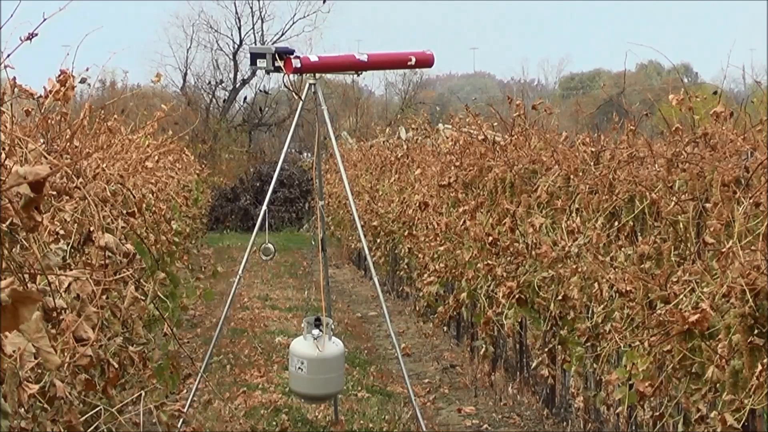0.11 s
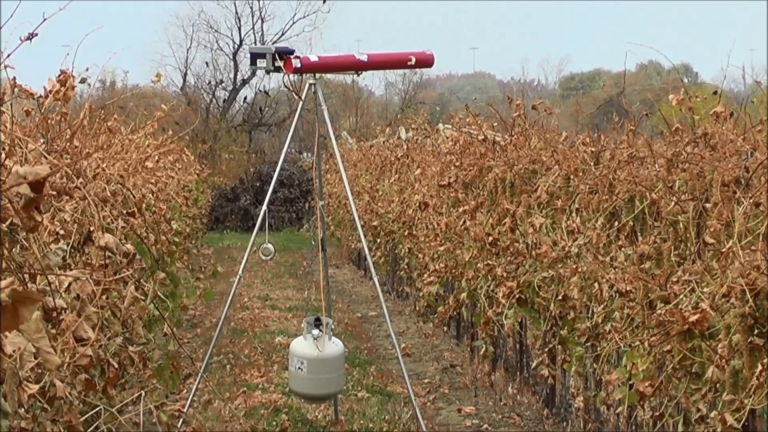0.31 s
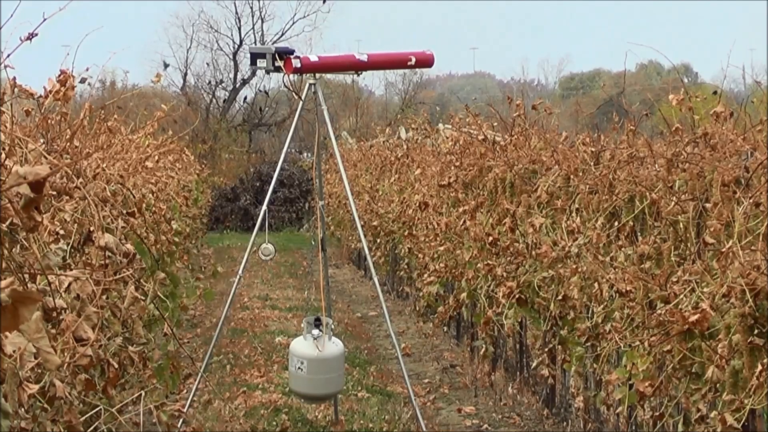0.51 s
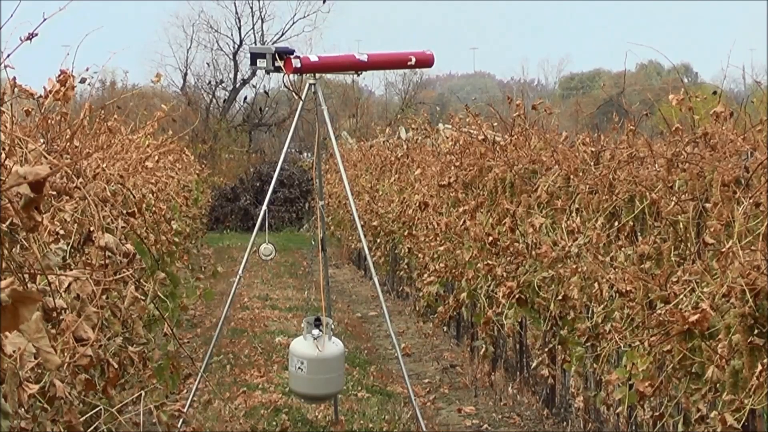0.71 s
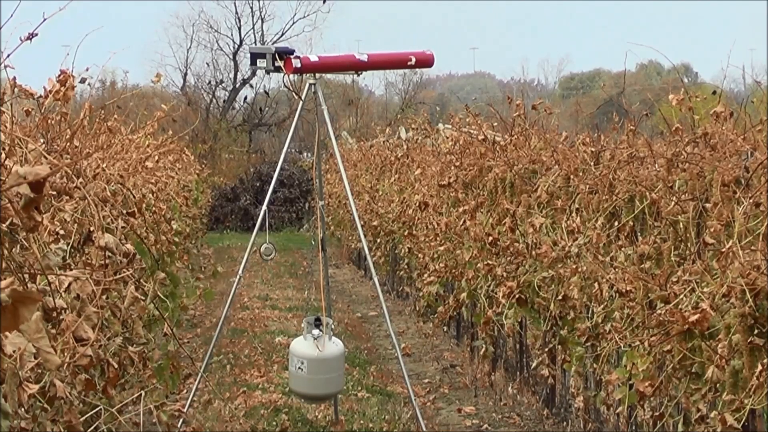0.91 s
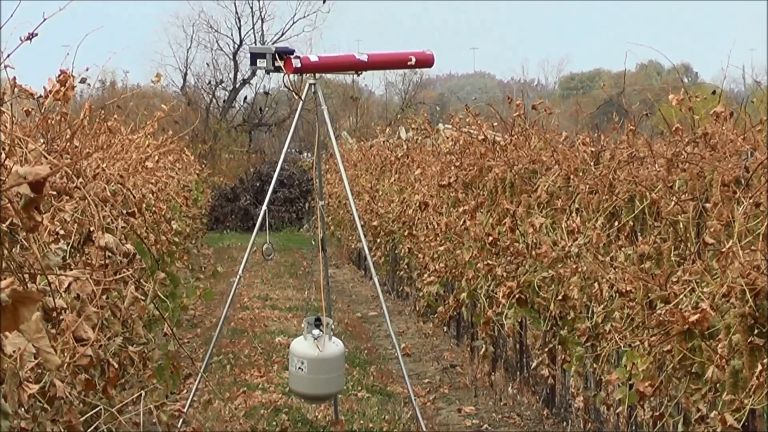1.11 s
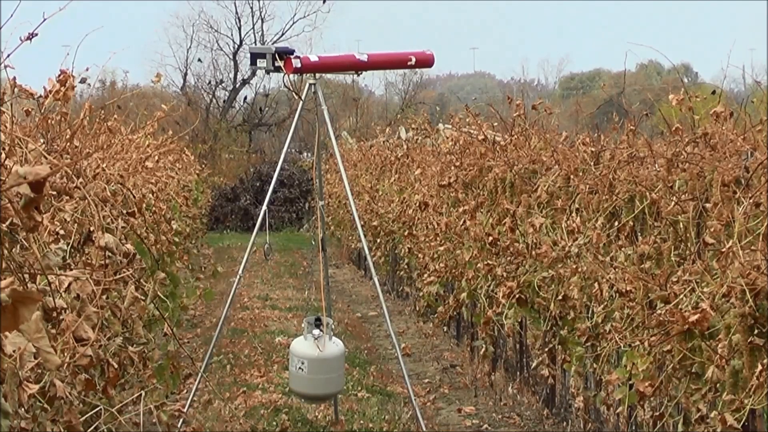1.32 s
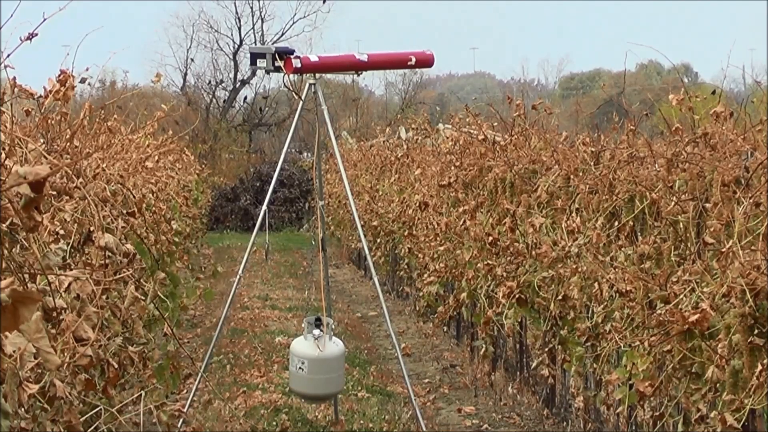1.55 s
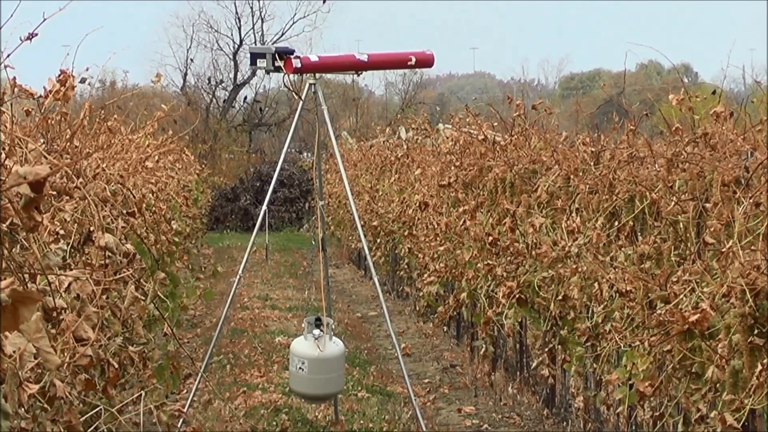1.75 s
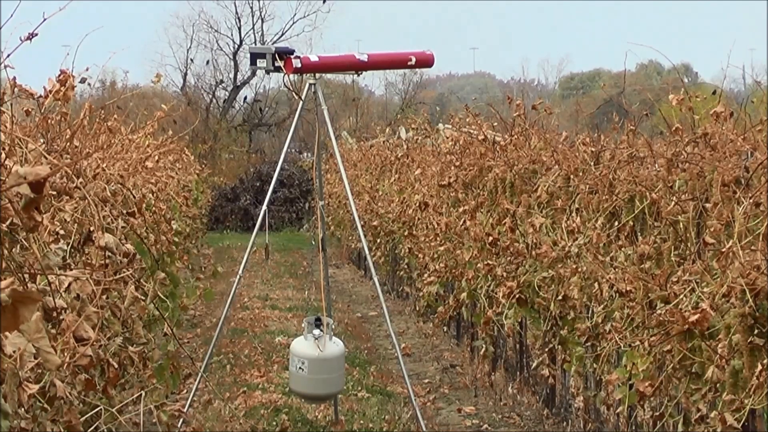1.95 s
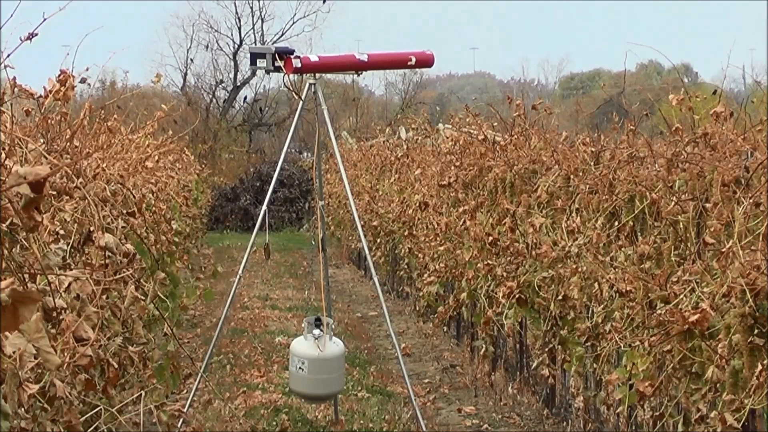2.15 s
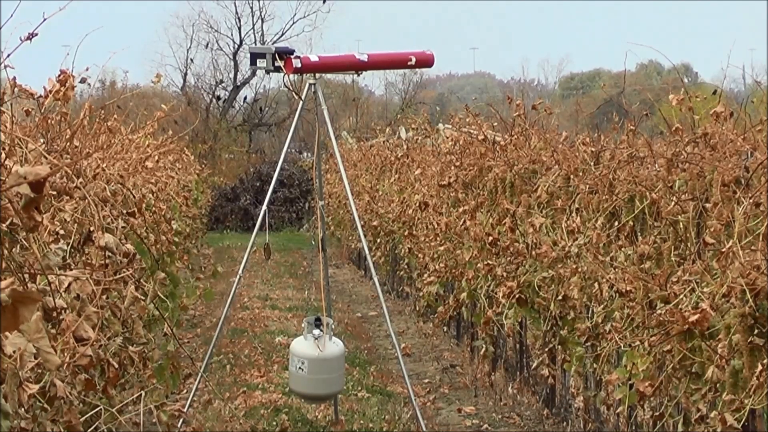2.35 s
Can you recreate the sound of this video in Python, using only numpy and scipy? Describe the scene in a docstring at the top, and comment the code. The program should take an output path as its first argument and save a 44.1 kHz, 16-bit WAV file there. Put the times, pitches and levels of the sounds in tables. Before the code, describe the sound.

In an open vineyard, a distant, slightly muffled gas cannon fires once; quick echoes crackle and die away, a late echo returns, then small birds twitter over steady traffic noise, thin insect shrill and recorder hiss.

```python
"""A propane bird-scare cannon fires once, far to the right across a vineyard, muffled by the ground.
Posts, vine rows and trees return ringing echoes and a dense scatter; larger surfaces return low booms.
Small birds whistle as gliding sines and insects shrill as narrow noise bands.
Behind them lies shaped noise for distant traffic and a far flock, and white hiss from the camera.
A very high whine is a set of sines, one tone wavering in level."""
import sys
import numpy as np
from scipy import signal
from scipy.fft import rfft, irfft
from scipy.io import wavfile
from scipy.ndimage import uniform_filter1d

SR = 44100
rng = np.random.default_rng(int(sys.argv[2]) if len(sys.argv) > 2 else 0)


def waveform_to_disk(signal):
    """Save audio, clipped to [-1, 1], as 16-bit WAV at the path in sys.argv[1]."""
    frames = np.transpose(np.atleast_2d(signal))
    scaled = np.clip(frames, -1, 1) * 32767
    samples = np.round(scaled).astype(np.int16)
    wavfile.write(sys.argv[1], SR, samples)


N = 110250  # 2.5 s
TIME = np.arange(N) / SR  # s
OPPOSITE = np.array([[1], [-1]])  # a sign for each row of a pair


def from_db(db):
    """Level law: gain is 10 to the power of level/20."""
    return 10 ** (np.asarray(db) / 20)


def rms_one(x):
    """Normalisation: scale to unit root-mean-square over all samples and channels."""
    return x / np.sqrt(np.mean(x ** 2) + 1e-20)


def at_hz(points, hz):
    """Logarithmic frequency scale: interpolate a spectrum table along log f."""
    points = np.array(points)
    return np.interp(np.log(hz), np.log(points[:, 0]), points[:, 1])


def drift(rate):
    """Double-pole low-pass filtering: noise becomes a slow wander of spread 1; rate in Hz."""
    step = 40  # samples between computed points
    pole = np.exp(-2 * step * np.pi * rate / SR)
    noise = rng.standard_normal(N // step + 2002)
    slow = signal.lfilter([1], [1, -2 * pole, pole * pole], noise)[2000:]  # settled part
    return np.interp(np.arange(N) / step, np.arange(len(slow)), rms_one(slow))


def shaped(x, gain):
    """Linear filtering: multiply the spectrum of x by gain(Hz)."""
    hz = np.maximum(np.arange(N // 2 + 1) * SR / N, 1)
    return irfft(rfft(x) * gain(hz), N)


def panned(x, pan_db):
    """Level-difference panning: a close pair of microphones hears no direction in the bass."""
    centred_below_hz = 360
    low = signal.sosfilt(signal.butter(1, centred_below_hz, fs=SR, output="sos"), x)
    sides_db = np.array([pan_db, -pan_db]).reshape(2, -1) / 2
    return low + (x - low) * from_db(sides_db)


def add(out, sound, s):
    """Superposition: mix a short sound in at s seconds."""
    i = int(s * SR)
    out[..., i:i + sound.shape[-1]] += sound[..., :N - i]


def wavelet(hz, cycles):
    """Triple resonance struck by a pulse: the envelope swells to 1 over some cycles, then dies."""
    phase = np.arange(int(7 * cycles / hz * SR)) / SR * hz  # in cycles
    envelope = (phase / cycles) ** 2 * np.exp(2 - 2 * phase / cycles)
    return envelope * np.sin(-2 * np.pi * phase)


# Single sharp echoes of the bang: t/s, ring peak level/dB, ring f/Hz,
# crack level before a lift and a band filter/dB, left-right level/dB, cycles to the peak
SHARP_ECHOES = [(.2143, -17, 700, -31, -6, .5), (.2181, -8.5, 1050, -40, -9, 1.1),
                (.2208, -17, 1600, -48, -6, 1), (.2243, -17, 1800, -44, -9, 1.6),
                (.2383, -11, 1850, -38, -10, 1.8), (.2408, -16, 1200, -46, -11, 1.1),
                (.2535, -15, 1800, -42, -11, 2.2), (.2563, -14, 1250, -42, -10, 1.3),
                (.2638, -20, 1700, -48, -2, 1.3), (.2683, -17, 1900, -40, -10, 1.3),
                (.2720, -14, 1800, -46, -6, 1.3), (.2845, -19, 1300, -50, -9, 1.3),
                (.2985, -18, 1700, -50, -8, 1.5), (.3103, -22, 1600, -38, -6, 1),
                (.3148, -22, 1500, -35, -6, 1), (.3198, -22, 1250, -36, -6, 1),
                (.3402, -17, 2300, -31, -12, 1.8), (.3415, -19, 1500, -37, -10, .7),
                (.3405, -27, 480, -60, -6, 1), (.2195, -23, 560, -60, -6, 1.2),
                (.372, -26, 1560, -47, -7, 1.5), (.386, -26, 550, -50, -3, .8),
                (.442, -26, 900, -48, -8, .8), (.65, -33, 1120, -55, 2, 3.0), (.676, -33, 900, -48, -3, .8),
                (.672, -38, 4700, -52, -3, 6.0), (.693, -35, 1300, -56, -1, 2.5),
                (.733, -35, 1300, -58, -1, 2.5), (.7555, -31, 780, -49, -3, 1.4),
                (.576, -34, 600, -58, -2, 1.2), (.849, -34, 1070, -55, 5, 3.0),
                (.894, -36, 1200, -60, 0, 2.5), (.931, -35, 1250, -61, 0, 2.5),
                (1.0255, -23.5, 1170, -60, 7, 2.5), (1.065, -29.5, 1060, -62, 6, 2.3),
                (1.089, -35, 1030, -62, 0, 2.0)]
# Low booms from larger surfaces: t/s, peak level/dB, f/Hz
LOW_BOOMS = [(0.215, -41, 220), (0.282, -36, 222), (0.312, -23, 180), (0.339, -48, 215),
             (0.387, -31.5, 176), (0.438, -34.5, 225), (0.671, -29.5, 143), (0.915, -40, 143)]
CRACK_DECAY_S, CRACK_LOW_HZ, CRACK_HIGH_HZ = 0.0017, 2450, 8000
CRACK_LIFT_DB = 4
BOOM_CYCLES = 1  # to the peak


def bang():
    """Discrete reflection: each echo is a short ring with a bright crack; booms are low rings."""
    out = np.zeros((2, N))
    length = 400  # samples in a crack
    decay = np.exp(-np.arange(length) / SR / CRACK_DECAY_S)
    band = signal.butter(3, [CRACK_LOW_HZ, CRACK_HIGH_HZ], "band", fs=SR, output="sos")
    for s, db, hz, crack_db, pan_db, cycles in SHARP_ECHOES:
        ring = from_db(db) * wavelet(hz, cycles)
        add(out, panned(ring, pan_db), s)
        noise = rng.standard_normal((2, length))
        burst = (noise + noise[0]) * decay  # partly alike in both channels
        crack = from_db(crack_db + CRACK_LIFT_DB) * signal.sosfilt(band, burst)
        add(out, panned(crack, pan_db), s)
    for s, db, hz in LOW_BOOMS:
        add(out, from_db(db) * wavelet(hz, BOOM_CYCLES), s)
    return out


# Course of the dense scatter: t/s, level of the middle/dB, level of the bass/dB,
# level of the treble/dB, left-right level/dB
SCATTER_COURSE = [(0.201, -53.5, -63, -80, -6), (0.206, -41, -59, -68, 5), (0.217, -43, -32, -32, -14),
                  (0.22, -32, -38, -41, -10), (0.248, -26.5, -37.5, -33.5, -9.5),
                  (.3, -29.5, -44.5, -39, -6), (0.336, -31, -40, -44, -8.5), (.356, -38, -52, -45.5, -8.5),
                  (.39, -33.5, -43, -44, -2.5), (.425, -29.5, -48.5, -42.5, -7.5),
                  (.48, -37, -47.5, -47.5, -6.5), (.55, -39, -66, -55, -1.5), (.65, -43.5, -57, -52, -1),
                  (.8, -47.5, -62.5, -54, -1.5), (.95, -47, -59, -54, -0.5), (1.01, -42.5, -89, -50.5, 3),
                  (1.05, -47.5, -80, -56, 2), (1.2, -62, -64, -59, 1), (1.4, -71, -93, -82, 3)]
# Relative spectrum of the scatter: f/Hz, level/dB
SCATTER_SPECTRUM = [(35, -57), (60, -24), (122, -7), (253, -9), (461, -15), (672, -8.5), (803, -8),
                    (1070, 0), (1400, -4), (1850, -5.5), (2500, -14), (3790, -25), (8050, -37.5),
                    (12000, -55), (15600, -84), (22000, -120)]
ECHOES_PER_S, SIZE_SPREAD_DB = 8000, 2.5
SCATTER_ALIKE, BASS_APART = 0.63, 0.21  # likeness of the channels; share of difference in the bass
BASS_TOP_HZ, TREBLE_FOOT_HZ = 400, 3000
BRIGHT_HZ, BRIGHT_DB, BRIGHT_FADE_S = 1520, 5, 0.16  # near echoes are brighter than far ones


def scatter():
    """Diffuse reflection: countless uneven echoes, with separate courses for bass, middle and treble."""
    s, *columns = np.transpose(SCATTER_COURSE)
    mid_db, bass_db, treble_db, pan_db = [np.interp(TIME, s, column) for column in columns]

    # Random impulses of either sign, coloured as a whole
    sizes_db = SIZE_SPREAD_DB * np.minimum(rng.exponential(1, (2, N)), 4)
    sizes = from_db(sizes_db) * rng.choice([-1, 1], (2, N))
    impulses = sizes * (rng.random((2, N)) < ECHOES_PER_S / SR)
    shared, apart = shaped(impulses, lambda hz: from_db(at_hz(SCATTER_SPECTRUM, hz)))
    pair = np.sqrt(1 + SCATTER_ALIKE) * shared + np.sqrt(1 - SCATTER_ALIKE) * apart * OPPOSITE
    bass_pair = shared + BASS_APART * apart * OPPOSITE

    def low(hz):
        """Low-pass response: unity in the bass, falling as the fourth power of f."""
        return 1 / (1 + (hz / BASS_TOP_HZ) ** 4)

    def high(hz):
        """High-pass response: rising as the fourth power of f to unity in the treble."""
        return 1 / (1 + (TREBLE_FOOT_HZ / hz) ** 4)

    bass = from_db(bass_db) * rms_one(shaped(bass_pair, low))
    treble = from_db(treble_db) * rms_one(shaped(pair, high))
    middle = rms_one(shaped(pair, lambda hz: 1 - low(hz) - high(hz)))

    # The upper middle starts lifted; the lift fades
    upper = shaped(middle, lambda hz: 1 / (1 + (BRIGHT_HZ / hz) ** 6))
    fading = np.exp(-np.maximum(TIME - s[0], 0) / BRIGHT_FADE_S)
    middle = middle + (from_db(BRIGHT_DB * fading) - 1) * upper
    return bass + panned(from_db(mid_db) * middle + treble, pan_db)


def note(length, start_hz, end_hz, flutter):
    """Frequency modulation: a soft whistle, a few hundredths of a second long, glides in pitch."""
    u = np.linspace(0, 1, int(length * SR))
    hz = start_hz + (end_hz - start_hz) * u + flutter[:len(u)]
    envelope = np.sin(np.pi * u) ** .5
    return np.sqrt(2) * envelope * np.sin(2 * np.pi * np.cumsum(hz) / SR)


WARBLE_EDGE_S, WARBLE_SWELL_DB = .01, 1.8


def warble(db, path, flutter, swell):
    """Frequency and amplitude modulation: a clear whistle winds along a pitch path and swells."""
    s, hz = np.transpose(path)
    t = np.arange(s[0], s[-1], 1 / SR)
    edge = np.clip(np.minimum(t - s[0], s[-1] - t) / WARBLE_EDGE_S, 0, 1)
    pitch = uniform_filter1d(np.interp(t, s, hz), size=130) + flutter[:len(t)]  # corners rounded
    level = from_db(db + WARBLE_SWELL_DB * swell[:len(t)])
    return np.sqrt(2) * edge * level * np.sin(2 * np.pi * np.cumsum(pitch) / SR)


# Single bird notes: t/s, length/s, start f/Hz, end f/Hz, level/dB, flutter/Hz
BIRD_NOTES = [(.1, .06, 5000, 4300, -60, 40), (.86, .035, 4900, 4800, -59, 150),
              (1.415, .03, 3500, 3700, -57, 40), (1.44, .03, 4950, 4750, -61, 30),
              (1.62, .025, 4400, 4350, -58, 40), (1.675, .045, 7000, 7400, -62, 400),
              (1.712, .025, 3600, 3640, -58, 30), (1.798, .02, 3550, 3350, -53, 60),
              (1.908, .028, 3580, 3680, -54, 40), (2.192, .04, 5300, 5130, -59, 50),
              (2.22, .035, 4720, 4600, -58, 50), (2.252, .016, 3850, 4000, -54, 80),
              (2.29, .03, 2720, 2680, -57, 30), (2.405, .045, 4250, 4230, -52.5, 70)]
# Warbled whistles: level/dB, pitch path as a list of (t/s, f/Hz)
BIRD_WARBLES = [(-54.5, [(1.716, 4850), (1.735, 5000), (1.746, 4880), (1.751, 3900), (1.762, 3700),
                (1.774, 3480), (1.796, 4150)]), (-56, [(1.934, 5200), (1.953, 4780), (1.968, 5130),
                (1.988, 5000), (1.994, 4720), (2.005, 4770), (2.032, 4730), (2.044, 4620), (2.06, 4660),
                (2.095, 4430)]), (-56, [(1.885, 3330), (1.9, 3170), (1.93, 3120), (2.0, 3260),
                (2.06, 3190)]), (-58.5, [(1.93, 2840), (2.0, 3000), (2.06, 2880), (2.072, 2900),
                (2.08, 2650)]), (-55.5, [(2.385, 3450), (2.41, 3400), (2.43, 3290), (2.47, 3330),
                (2.5, 3400)]), (-60, [(2.385, 3180), (2.425, 3090), (2.455, 3000), (2.5, 3150)])]
# Echo of the birds off the vine rows: delay t/s, level/dB
ROW_ECHOES = [(.011, -11)]
TWITTER_PER_S, TWITTER_DB, TWITTER_S = 40, -64, .03  # level and length vary about these
TWITTER_LOW_HZ, TWITTER_HIGH_HZ = 2400, 5000  # range of starting pitch


def birds():
    """Reflection: near notes, warbles and random twitter return as a faint quick echo off the rows."""
    out = np.zeros((2, N))
    wobble = drift(250)
    for s, length, start_hz, end_hz, db, flutter_hz in BIRD_NOTES:
        flutter = flutter_hz * wobble[int(s * SR / 2):]
        sound = from_db(db) * note(length, start_hz, end_hz, flutter)
        add(out, panned(sound, -5.0), s)

    swell = drift(30)
    for k, (db, path) in enumerate(BIRD_WARBLES):
        offset = k * N // 8  # another stretch of the wander for each warble
        sound = warble(db, path, 25 * wobble[offset:], swell[offset:])
        add(out, panned(sound, -3.6), path[0][0])

    for when, pitch, size, loudness, glide in rng.random((int(TWITTER_PER_S * N / SR), 5)):
        hz = TWITTER_LOW_HZ + (TWITTER_HIGH_HZ - TWITTER_LOW_HZ) * pitch
        end_hz = hz * (1.03 - .1 * glide)
        flutter = 30 * wobble[int(when * N / 2):]
        sound = note(TWITTER_S * (.5 + size), hz, end_hz, flutter)
        sound = from_db(TWITTER_DB + 8 * (loudness - .5)) * sound
        add(out, panned(sound, -5 * size), when * N / SR)  # longer notes lie further right

    direct = out.copy()
    for delay_s, db in ROW_ECHOES:
        add(out, from_db(db) * direct, delay_s)
    return out


# Insect shrilling: centre f/Hz, width f/Hz, level/dB
SHRILL_BANDS = [(6630, 72, -72), (3626, 110, -61.5)]


def insects():
    """Narrow-band noise: thin steady Gaussian bands of shrilling."""
    noise = rng.standard_normal((2, N)) + rng.standard_normal(N)  # partly alike in both channels
    out = np.zeros((2, N))
    for centre_hz, width_hz, db in SHRILL_BANDS:
        band = shaped(noise, lambda hz: np.exp(-.5 * ((hz - centre_hz) / width_hz) ** 2))
        out += from_db(db) * rms_one(band)
    return out


# Relative spectrum of traffic and far flock: f/Hz, level/dB
FIELD_SPECTRUM = [(15, -67), (25, -37), (41, -22), (90, -7), (147, -11), (179, -7), (279, -10.5),
                  (308, -12), (599, -9), (712, -3.5), (981, 1), (1290, -1.5), (1450, -6.5), (4740, -13),
                  (5780, -26), (6700, -22), (9000, -34.5), (11700, -56), (19800, -120)]
# Likeness of left and right in the field: f/Hz, correlation from 0 to 1
FIELD_LIKENESS = [(60, .99), (110, 1), (200, 0.94), (380, 0.11), (700, 0.83), (1400, 0.68), (3000, 0.87),
                  (6000, 0.52), (9000, 0.27)]
# Balance of the field: f/Hz, left-right level/dB
FIELD_SIDES = [(60, 0), (110, 0.5), (200, -1.5), (380, 0.5), (700, -1.5), (1290, -3.5), (2380, -2.0),
               (4400, -2.5), (8120, 0.5), (15000, -3)]
FIELD_DB = -46.5


def field(patchy_db):
    """Partial coherence: stereo noise whose overlapping octave bands each flicker a little."""
    together = drift(1.0)
    mid_side = rng.standard_normal((2, N))

    def channel(sign):
        """Sum-and-difference stereo: weight mid and side by likeness, then colour one channel."""
        def gain(hz):
            level_db = at_hz(FIELD_SPECTRUM, hz) + sign * at_hz(FIELD_SIDES, hz) / 2
            return from_db(level_db) * np.sqrt(1 + at_hz(FIELD_LIKENESS, hz) * OPPOSITE)
        mid, side = shaped(mid_side, gain)
        return mid + sign * side

    pair = np.array([channel(1), channel(-1)])
    out = np.zeros((2, N))
    for centre in 25 * 2 ** np.arange(0, 9.5, .5):  # Hz, half an octave apart
        bell = lambda hz: np.cos(np.pi * np.clip(np.log2(hz / centre), -.5, .5)) ** 2
        flicker_db = patchy_db * (.2 * together + drift(6))
        out += shaped(pair, bell) * from_db(flicker_db)
    return from_db(FIELD_DB) * rms_one(out)


WHINE_HZ, WHINE_DB = 15734.3, -59.5
WAVER_HZ, WAVER_DEPTH, WAVER_PEAK_S = 13.0, 0.53, 0.02
COMB_SPACING_HZ, COMB_DB, COMB_FALL_DB = 59.94, -76, 1.3  # spacing, first level, fall per tone


def whine():
    """Amplitude modulation: a very high tone wavers 13 times a second above a comb of weaker tones."""
    waver = 1 + WAVER_DEPTH * np.cos(2 * np.pi * WAVER_HZ * (TIME - WAVER_PEAK_S))
    out = from_db(WHINE_DB) * waver * np.sin(2 * np.pi * WHINE_HZ * TIME)
    for k, phase in enumerate(rng.uniform(0, 2 * np.pi, 8)):
        hz = WHINE_HZ - (k + 1) * COMB_SPACING_HZ
        out += from_db(COMB_DB - COMB_FALL_DB * k) * np.sin(2 * np.pi * hz * TIME + phase)
    return np.sqrt(2) * out


def hiss():
    """White noise: camera hiss, nearly alike in both channels."""
    return from_db(-59.5) * (rng.standard_normal(N) + 0.052 * rng.standard_normal((2, N)))


def scene():
    """Superposition: cannon echoes, birds, insects, field, whine and hiss sound together."""
    return bang() + scatter() + birds() + insects() + field(patchy_db=1.5) + whine() + hiss()


LOW_CUT_HZ, CUTOFF_HZ = 40, 15810


def record(dry):
    """Band limitation: the deepest bass is rolled off and the top is cut steeply."""
    dry = signal.sosfilt(signal.butter(2, LOW_CUT_HZ, "high", fs=SR, output="sos"), dry)
    return shaped(dry, lambda hz: 1 / (1 + (hz / CUTOFF_HZ) ** 1200))


dry = scene()
out = record(dry)
waveform_to_disk(out)
```